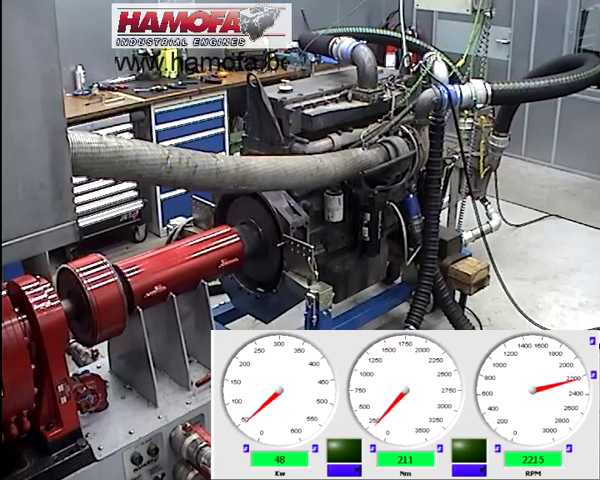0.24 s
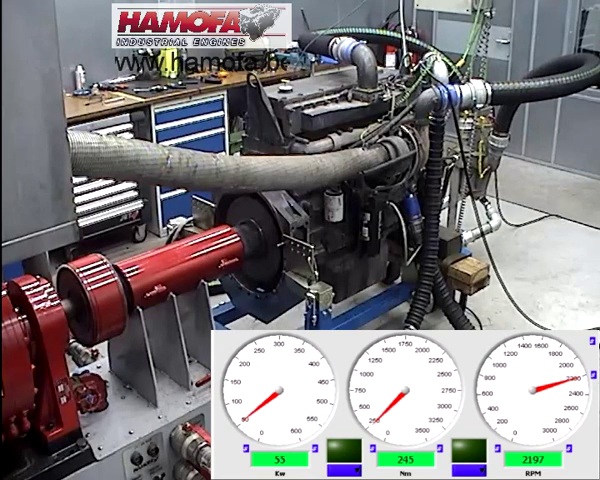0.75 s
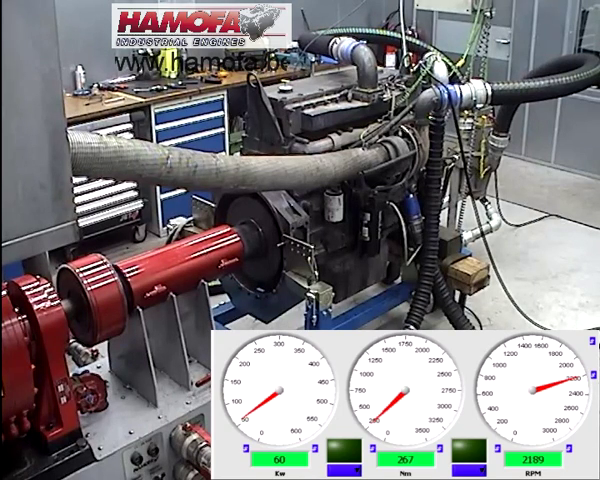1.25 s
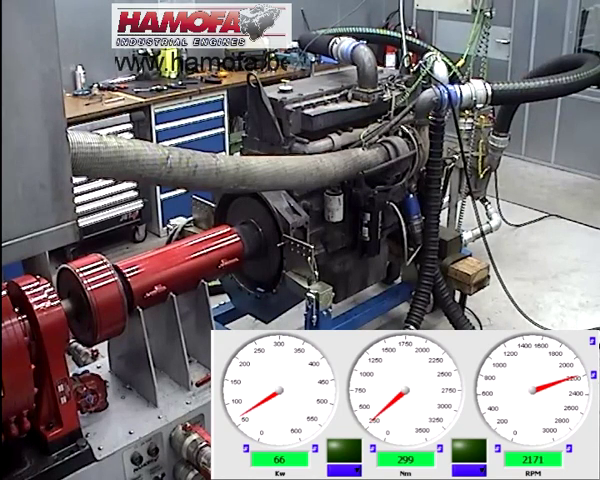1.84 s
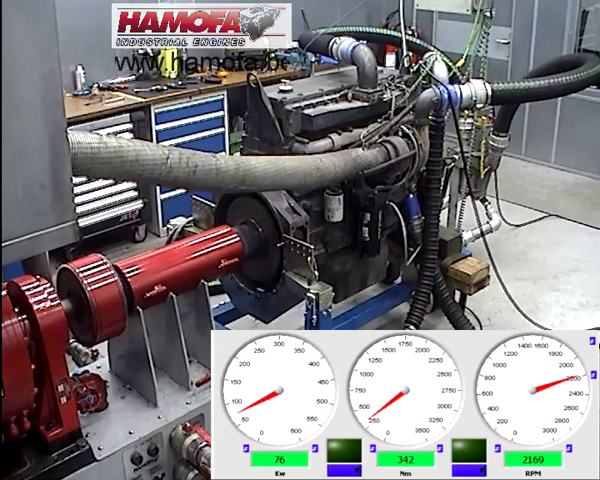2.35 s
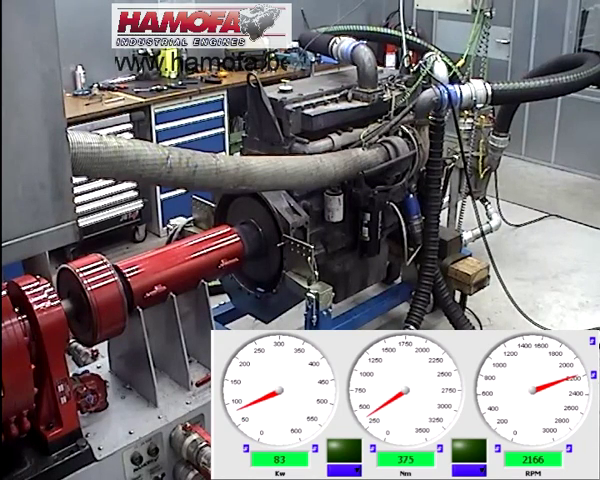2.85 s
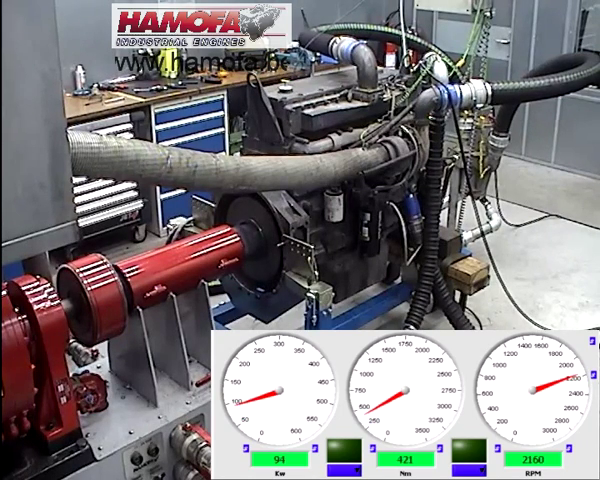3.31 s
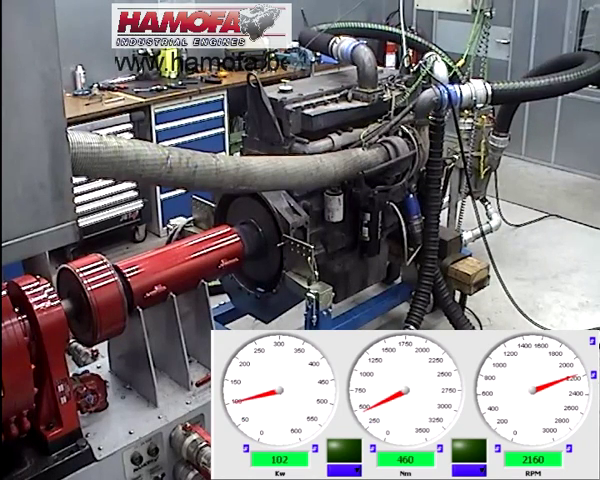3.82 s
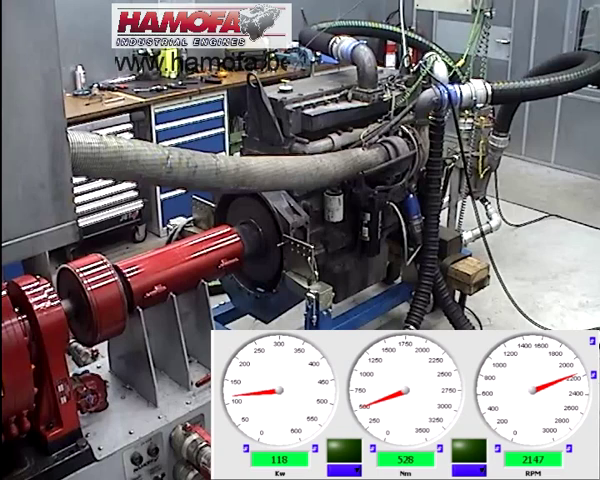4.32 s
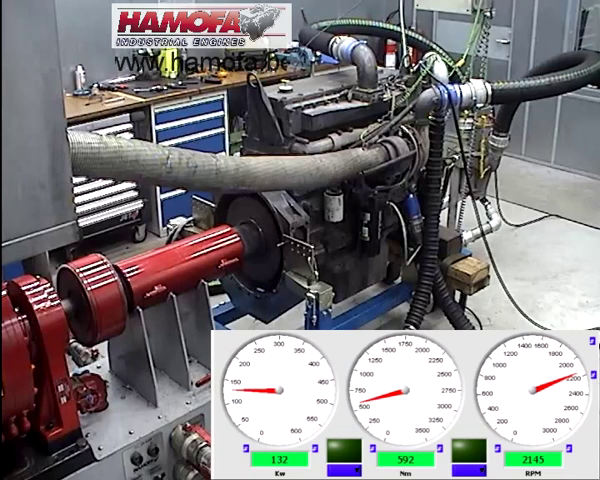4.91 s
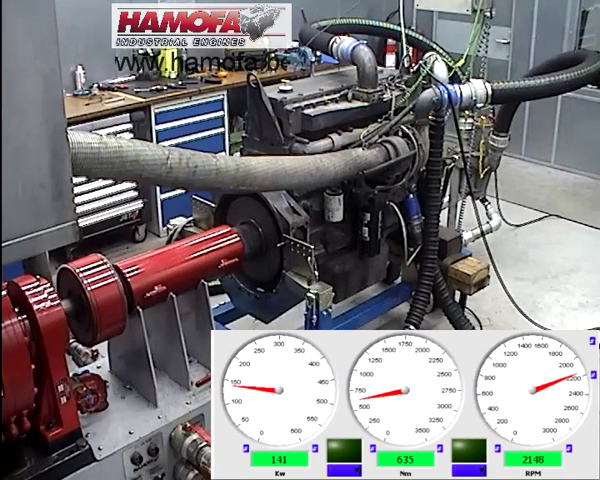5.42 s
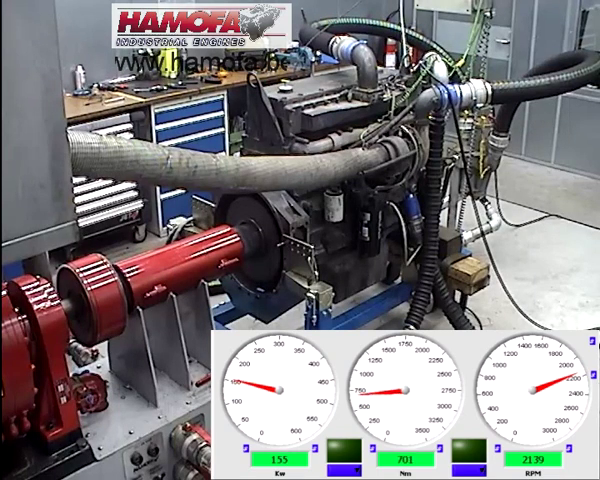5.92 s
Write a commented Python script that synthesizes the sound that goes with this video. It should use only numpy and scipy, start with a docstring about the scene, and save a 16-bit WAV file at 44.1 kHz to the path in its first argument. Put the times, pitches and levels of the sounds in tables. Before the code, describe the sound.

A big turbo diesel runs hard indoors, its knocking drone sagging a little in pitch while a thin whistle rises and dies away.

```python
"""Turbo diesel on a dynamometer

A six-cylinder diesel runs at speed in a hard-walled test cell. As the brake load rises, the crank
slows a little, combustion knocks harder and the turbo whistle climbs and fades. Air buffets the
microphone of a camera whose low sampling rate mirrors the top of the treble."""
import sys
import numpy as np
from scipy import signal
from scipy.fft import rfft, irfft
from scipy.io import wavfile
from scipy.ndimage import uniform_filter1d

SR = 44100
rng = np.random.default_rng(int(sys.argv[2]) if len(sys.argv) > 2 else 0)


def materialize(psi):
    """Save the field psi as 16-bit PCM at rate SR to the path in sys.argv[1].

    A 1-D psi becomes a single channel; in a 2-D psi each row is a channel.
    """
    bounded = np.clip(np.atleast_2d(psi).T, -1, 1)
    quanta = np.round(bounded * 32767).astype(np.int16)
    wavfile.write(sys.argv[1], SR, quanta)


N = 271656
TIME = np.arange(N) / SR
BINS = np.fft.rfftfreq(N, 1 / SR)


def gain_of(db):
    """Decibels to gain."""
    return 10 ** (np.asarray(db) / 20)


def unit_rms(x):
    """Scales to rms 1."""
    return x / np.sqrt(np.mean(x ** 2) + 1e-20)


def coloured(x, points):
    """EQ through (f/Hz, level/dB) points on a log-frequency axis."""
    hz, db = np.transpose(points)
    return irfft(rfft(x) * gain_of(np.interp(np.log(BINS + 1), np.log(hz), db)), N)


def wander(rate_hz):
    """Smooth random modulation of rms 1."""
    return unit_rms(irfft(rfft(rng.standard_normal(N)) * np.exp(-(BINS / rate_hz) ** 2), N))


def swelling(steady, rows):
    """A steady gain with bell-shaped swells from (t/s, length/s, level/dB) rows, added in power."""
    power = sum(gain_of(db) ** 2 * np.exp(-2 * (2 * (TIME - s) / length) ** 2) for s, length, db in rows)
    return np.sqrt(steady ** 2 + power)


def resonance(hz, centre_hz, width_hz):
    """Gain of a resonance, 1 at its centre."""
    return 1 / (1 + (2 * (hz - centre_hz) / width_hz) ** 2)


def mode_response(modes):
    """Gain spectrum of (f/Hz, width/Hz, level/dB) resonances, added in power."""
    return np.sqrt(sum((gain_of(db) * resonance(BINS, hz, width)) ** 2 for hz, width, db in modes))


def ring(x, t60):
    """Dense reflections of even colour that die away."""
    t = np.arange(SR // 2) / SR
    spectrum = rfft(rng.standard_normal(len(t)) * gain_of(-60 * t / t60))
    tail = irfft(spectrum / np.sqrt(uniform_filter1d(abs(spectrum) ** 2, size=50)), len(t))
    return signal.fftconvolve(x, tail / np.linalg.norm(tail))[:N]


def buffet(steady_db=-34.5):
    """Lumps of moving air rumble on the microphone, with three late gusts."""
    # sub-heavy tilt of the air: f/Hz, relative level/dB
    colour = [(5, -28), (14, -12.5), (22, 0), (32, -1.5), (45, -11), (70, -25), (110, -29), (250, -52),
              (600, -91.5)]
    # gust crests: t/s, length/s, level/dB
    gusts = [(4.58, 0.22, -27.5), (5.42, 0.2, -24.5), (5.97, 0.076, -23.5)]
    air = unit_rms(coloured(rng.standard_normal(N), colour))
    envelope = np.sqrt(uniform_filter1d(air ** 2, size=SR // 5))
    return swelling(gain_of(steady_db), gusts) * air / envelope


def turbo(turns, load, unloaded_hz=6646, climb_hz=3482, ripple_hz=12, drift_hz=9):
    """Seven blades whistle higher with load; the engine ripples the shaft speed, walls smear the tone."""
    # brief flares of the climbing whistle: t/s, length/s, level/dB
    whistle_swells = [(0.14, 0.16, -40.5), (0.32, 0.11, -43), (0.672, 0.095, -32.5), (0.769, .055, -30.5),
                      (0.872, .07, -34.5), (1.0, 0.13, -37), (1.22, 0.072, -26), (1.381, 0.21, -26.5),
                      (1.565, 0.15, -31.5), (1.91, 0.41, -40.5), (2.28, .12, -53)]
    # one long swell of a faint lower whine: t/s, length/s, level/dB
    whine_swells = [(3.75, 1.1, -53.5)]
    hz = unloaded_hz + climb_hz * load + ripple_hz * np.sin(2 * np.pi * turns) + drift_hz * wander(29)
    phase = 2 * np.pi * np.cumsum(hz) / SR
    # the whistle escapes best in one broad band and fades as it climbs out of it
    escape = gain_of(-42) * resonance(hz, centre_hz=7150, width_hz=1500) ** 2
    whistle = np.sin(phase) * swelling(escape, whistle_swells)
    whine = np.sin(phase * 4 / 7) * swelling(gain_of(-61) * load ** 2, whine_swells)
    flutter_depth = np.interp(hz, [7100, 7600], [.1, .35])  # less steady as the shaft speeds up
    tones = np.sqrt(2) * (whistle + whine) * (1 + flutter_depth * wander(51))
    return tones + gain_of(-15) * ring(tones, t60=.35)


def panels(turns, load, force, throb_db=1.0, waver=0.087, level_db=-1):
    """Thin panels sing as the slowing crank slides its weak high orders through their resonances."""
    # sharp panel modes: f/Hz, width/Hz, relative level/dB
    modes = [(435.9, 9.5, -44.5), (788.7, 16.6, -35), (830, 7.9, -36.5), (892, 5.6, -34.5), (900, 34, -42),
             (973, 8.9, -45), (1004.4, 26, -35), (1017, 6.4, -47.5), (1043, 14, -38.5), (1103, 73, -47.5),
             (1125, 8, -38), (1136, 19, -38), (1338, 8.3, -44.5), (1402, 98, -49)]
    response = mode_response(modes)
    whole = np.arange(12, 41)
    singing = np.zeros(N)
    # half orders come from unequal cylinders and need more load to speak
    for orders, unloaded_db in (whole, -3.5), (whole + .5, -15.5):
        push = np.sqrt(2) * sum(np.cos(2 * np.pi * (order * turns + rng.random())) for order in orders)
        singing += irfft(rfft(push) * response, N) * gain_of(unloaded_db * (1 - load))
    return singing * (1 + waver * wander(12)) * gain_of(level_db + throb_db * force)


def clatter(turns, decay_cycles=.012, scatter_db=3, flutter_db=0.6, count=18):
    """Valves and injectors each rattle once in two revolutions, at their own crank angle, over hiss."""
    envelope = np.ones(N)  # the steady hiss
    for offset in (np.arange(count) + rng.random(count)) / count:
        cycle = turns / 2 + offset
        strength = gain_of(scatter_db * rng.uniform(-0.88, 1, size=200))
        envelope += strength[cycle.astype(int)] * np.exp(-(cycle % 1) / decay_cycles)
    return unit_rms(envelope * gain_of(flutter_db * wander(31)) * rng.standard_normal(N))


def hard_knocks(hz=1020, rise_s=0.0022, t60=0.082):
    """Two stray hard firings set the main block resonance ringing."""
    # accents: t/s, peak level/dB
    hits = [(3.079, -22), (5.699, -25)]
    blows = np.zeros(N)
    for s, db in hits:
        blows[round(s * SR)] = gain_of(db)
    t = np.arange(SR // 8) / SR
    mode = np.sin(2 * np.pi * hz * t) * (1 - np.exp(-t / rise_s)) * gain_of(-60 * t / t60)
    return signal.fftconvolve(blows, mode / abs(mode).max())[:N]


def knock(turns, scatter_db=0.5, jitter_s=.00011, t60=0.14):
    """Three firings a revolution; each cylinder strikes the block by its own path, never twice alike."""
    # punch of each cylinder in firing order: relative level/dB
    cylinders = [1.5, -1.5, 0, -3, 3, -2]
    # EQ that makes the blows duller than the valve rattle: f/Hz, level/dB
    colour = [(380, -15), (560, 4), (850, -1), (1150, -2.5), (2500, 0), (4500, -4.5), (7500, -4.5)]
    firings = np.flatnonzero(np.diff(np.floor(3 * turns)))
    strength, delay = rng.standard_normal((N, 2))[:len(firings)].T
    firings = np.clip(firings + np.round(delay * jitter_s * SR).astype(int), 0, N - 1)
    out = np.zeros(N)
    for k, db in enumerate(cylinders):
        own = slice(k, None, len(cylinders))
        blows = np.zeros(N)
        blows[firings[own]] = gain_of(db + scatter_db * strength[own])
        out += ring(blows, t60)
    return coloured(unit_rms(out), colour)


def block(x, load, unloaded_lift_db=1.5, band_hz=1000, band_width_hz=350):
    """The engine's metal body rings; its knock band stands out a little more at light load."""
    # modes of block, covers and pipes: f/Hz, width/Hz, relative level/dB
    modes = [(120, 394, -16.5), (289, 140, -12), (922, 165, -8), (1009, 54, -5.5), (1133, 74, -9.5),
             (1167, 170, -12.5), (1395, 124, -8), (1627, 45, -12), (1776, 158, -14.5), (2076, 255, -17.5),
             (2330, 147, -17.5), (2480, 66, -12.5), (2593, 168, -13.5), (2936, 330, -28.5),
             (3287, 205, -25.5), (3510, 119, -30.5), (3793, 170, -26), (4083, 230, -19.5),
             (4224, 91, -17.5), (4550, 120, -21.5), (4562, 213, -15.5), (4808, 133, -12.5),
             (5038, 300, -18), (5600, 220, -37.5), (5942, 186, -19), (6260, 253, -28), (6855, 270, -25.5),
             (7190, 310, -23), (7600, 650, -34.5)]
    spectrum = rfft(x) * mode_response(modes)
    knock_band = irfft(spectrum * np.exp(-((BINS - band_hz) / band_width_hz) ** 2), N)
    return unit_rms(irfft(spectrum, N) + knock_band * (gain_of(unloaded_lift_db * (1 - load)) - 1))


def drone(turns, load, force, waver=.035, waver_per_order=0.0033, throb_db_per_order=0.0536):
    """Crank tones: firing harmonics line up loosely as pulses, the rest come from unequal cylinders."""
    # crank orders: cycles per revolution, unloaded level/dB, level/dB from half load on
    orders = [(1, -30.5, -37), (2, -49, -55), (3, -35, -32), (4, -49, -46), (4.5, -62, -47), (5, -39, -41),
              (5.5, -54, -49), (6, -31, -29), (6.5, -49, -53), (7, -48, -47), (7.5, -61, -47),
              (8, -47, -37), (9, -40, -36), (9.5, -51, -49), (10, -36, -38), (11, -61, -51), (13, -61, -49),
              (19, -49, -49), (24, -42, -56), (30, -45, -58)]
    crank_hz = np.gradient(turns) * SR
    crank_angle = 2 * np.pi * turns + 0.0072 * wander(35)  # the crank twists unevenly
    out = np.zeros(N)
    for order, *levels in orders:
        phase = np.pi * (1 + rng.uniform(-1, 1) * (.45 if order % 3 == 0 else 1))
        unsteady = 1 + (waver + waver_per_order * order) * (wander(7.5) + 1j * wander(17))
        tone = (unsteady * np.exp(1j * (order * crank_angle + phase))).real
        db = np.interp(load, [0, .5], levels) + throb_db_per_order * order * force
        # the 360 Hz crank tone dips for a moment as the load builds
        dip_db = -8.5 * resonance(order * crank_hz, centre_hz=360.8, width_hz=2.1)
        out += np.sqrt(2) * gain_of(db + dip_db) * tone
    return out


def scene(load_rise_s=3.275, metal_db=-31, metal_rise_db=1.82, clatter_db=-2.0, clatter_rise_db=2.5):
    """Crank angle and brake load drive the engine; stray knocks and air rumble lie on top."""
    # the crank sags under the brake: t/s, speed/rpm
    speed = [(0, 2219), (0.3, 2204), (1.2, 2185), (2, 2164), (3, 2164), (3.9, 2148), (5.2, 2145),
             (6.16, 2137)]
    rpm = np.interp(TIME, *np.transpose(speed))
    turns = np.cumsum(rpm) / 60 / SR
    load = 1 - np.exp(-(TIME / load_rise_s) ** 2)  # S-curve from 0 towards 1
    # sharper combustion lifts the high orders together, at random and once every two revolutions
    force = .9 * wander(20) + .8 * np.cos(np.pi * turns)
    tones = drone(turns, load, force) + panels(turns, load, force) + turbo(turns, load)
    rattle = gain_of(clatter_db + clatter_rise_db * load) * clatter(turns)
    metal = gain_of(metal_db + metal_rise_db * load) * block(knock(turns) + rattle, load)
    return (tones + metal + hard_knocks() + buffet())[None]


def record(dry, sampling_hz=16000, cutoff_hz=10000):
    """The camera's coarse sampling mirrors the treble about half its rate; filters then trim the top."""
    # output roll-off: f/Hz, level/dB
    roll_off = [(7200, 0), (8000, -3), (8800, -12), (9200, -18.5), (9400, -24.5), (9600, -31)]
    mirrored = dry[0] * (1 + 2 * np.cos(2 * np.pi * sampling_hz * TIME))
    low_pass = signal.firwin(511, cutoff_hz, window=("kaiser", 9), fs=SR)
    return signal.oaconvolve(coloured(mirrored, roll_off), low_pass, "same")[None]


dry = scene()
out = record(dry)
materialize(out)
```